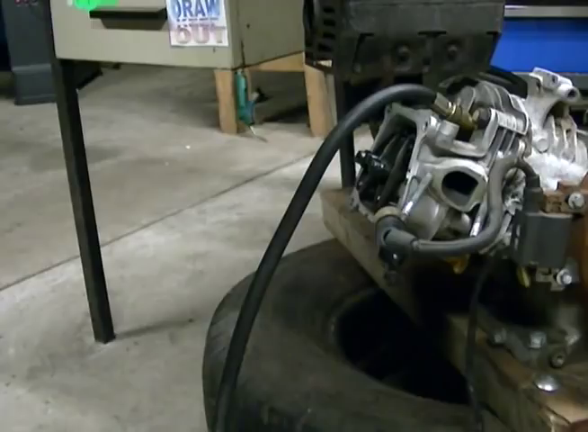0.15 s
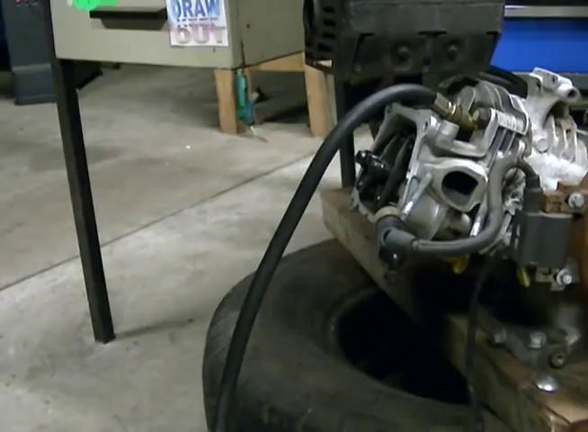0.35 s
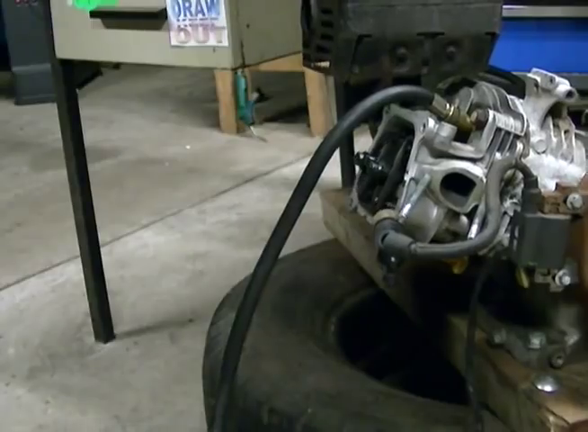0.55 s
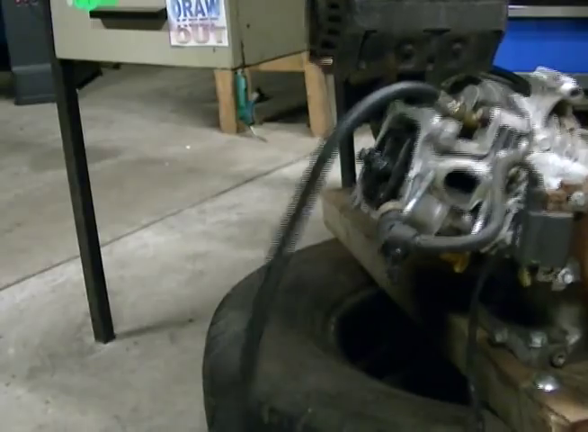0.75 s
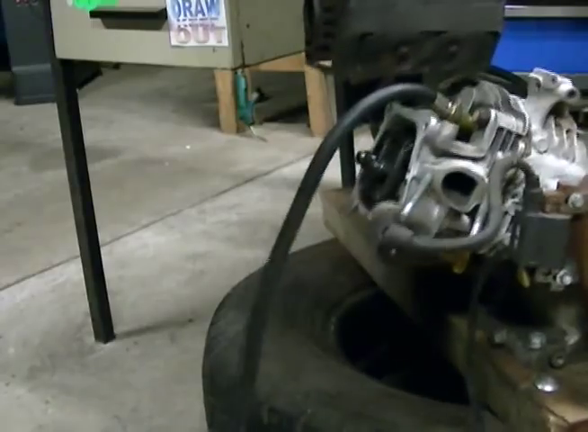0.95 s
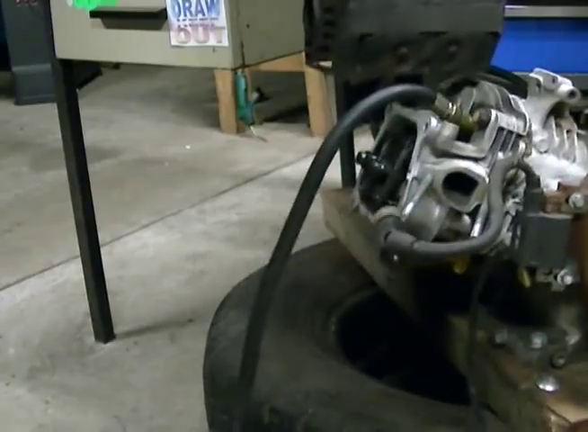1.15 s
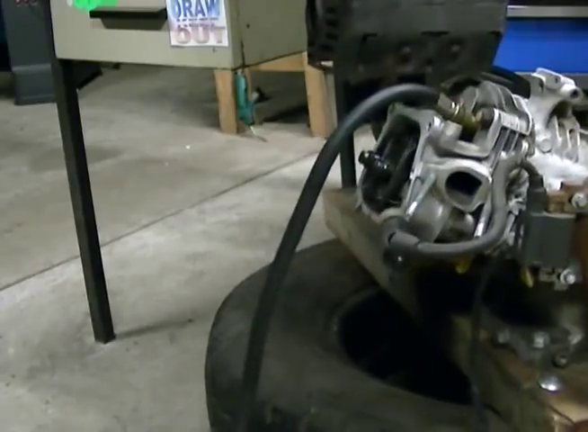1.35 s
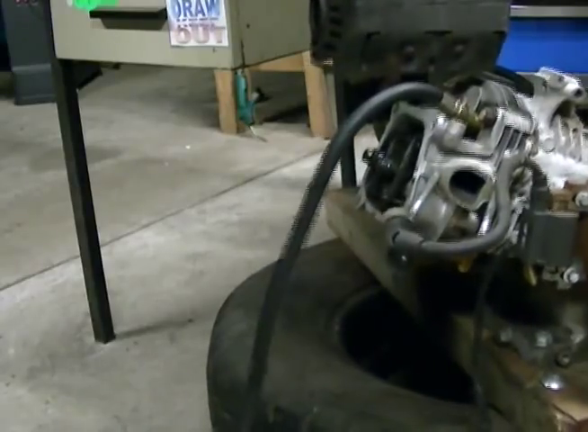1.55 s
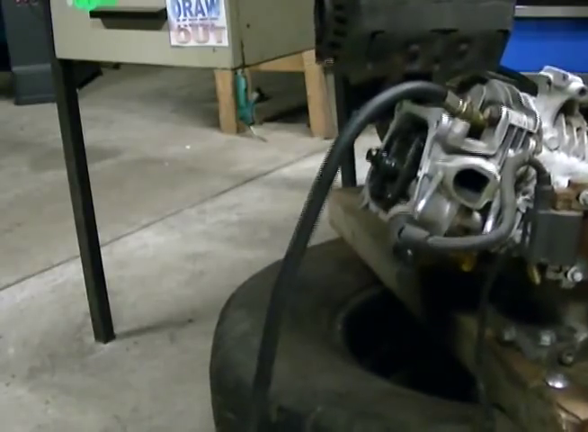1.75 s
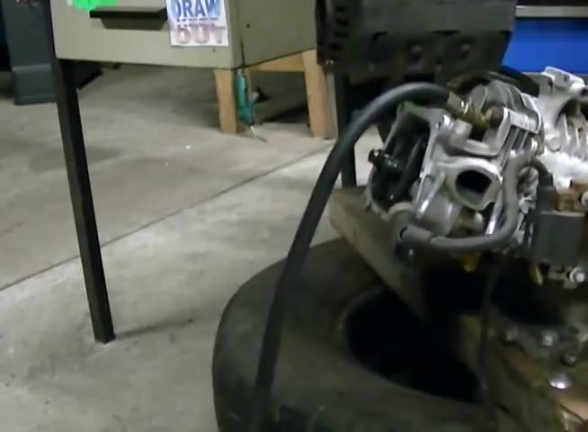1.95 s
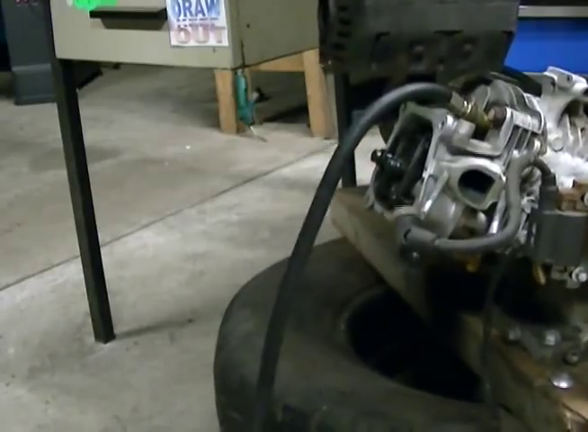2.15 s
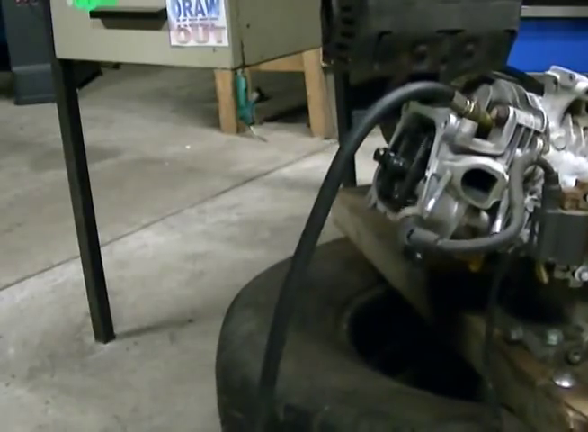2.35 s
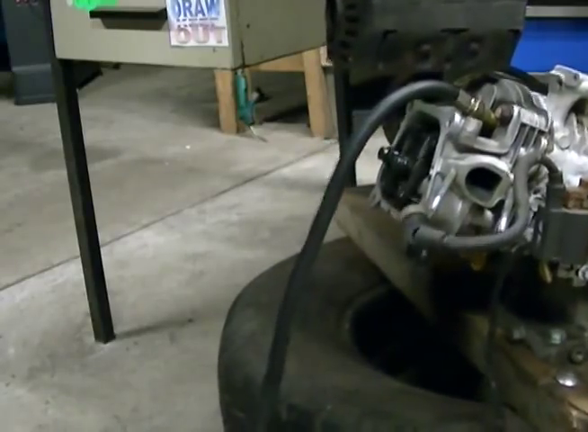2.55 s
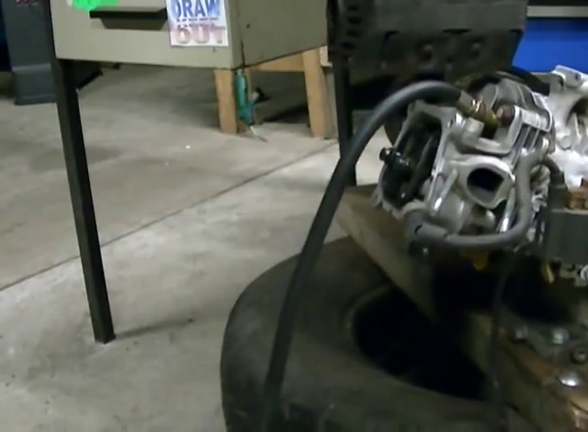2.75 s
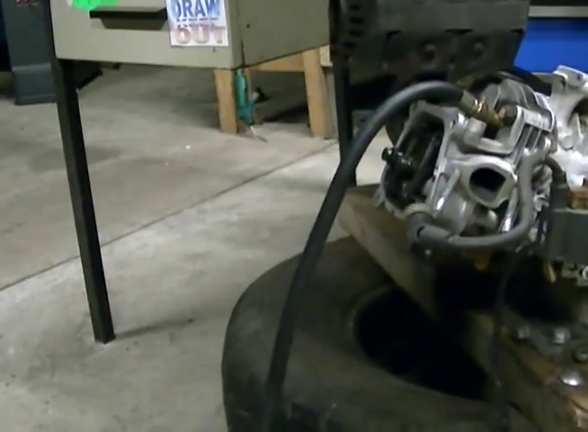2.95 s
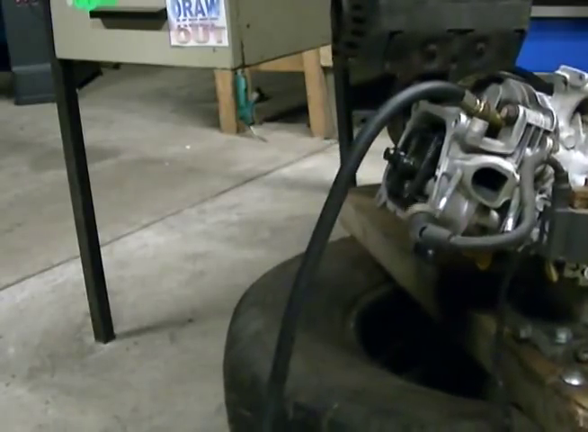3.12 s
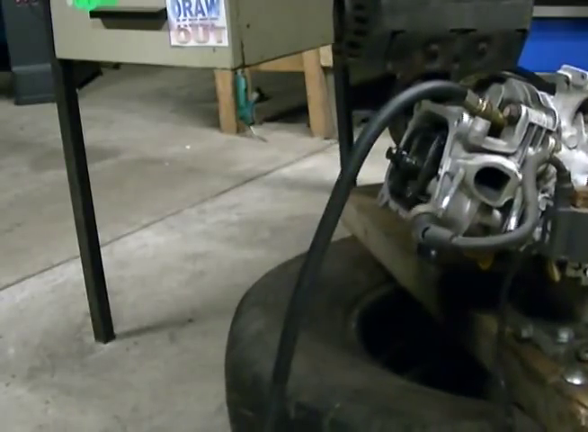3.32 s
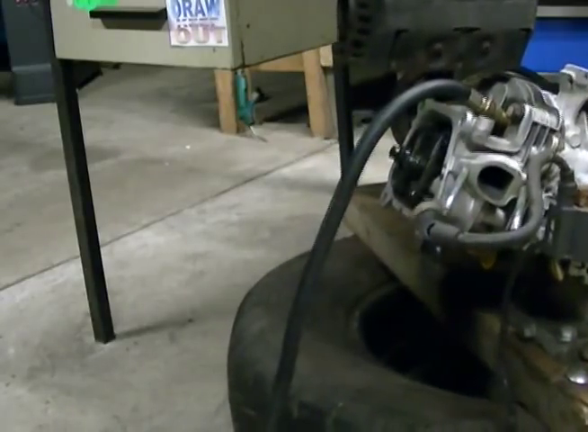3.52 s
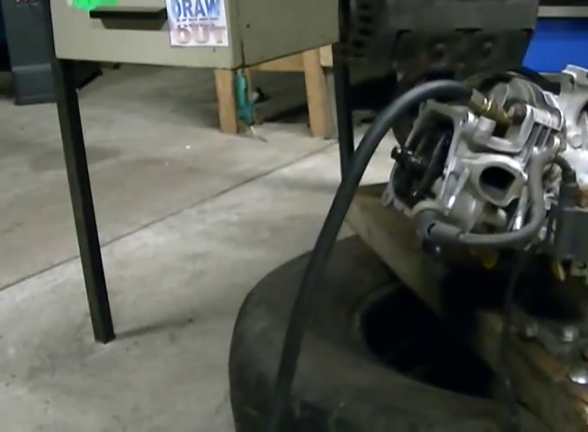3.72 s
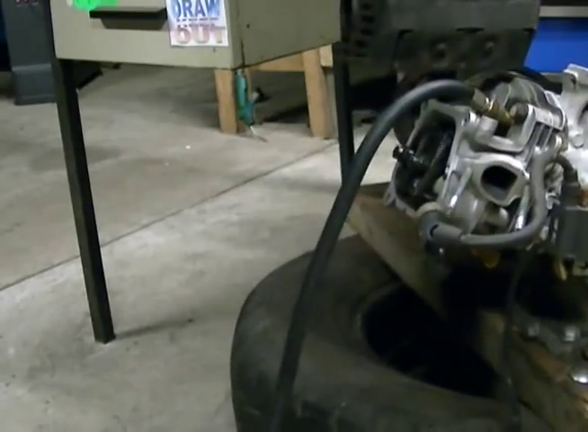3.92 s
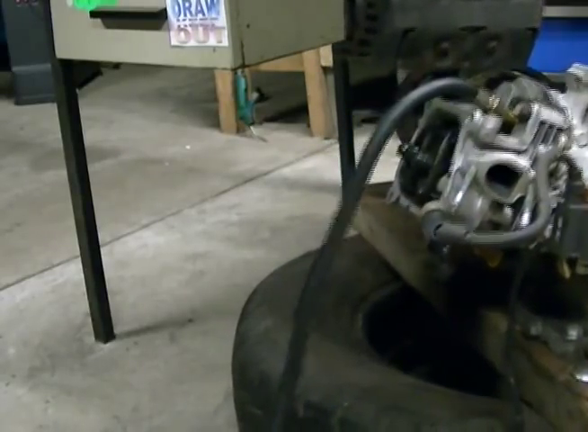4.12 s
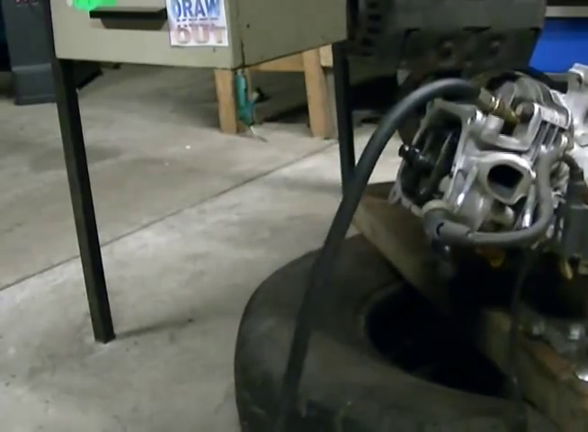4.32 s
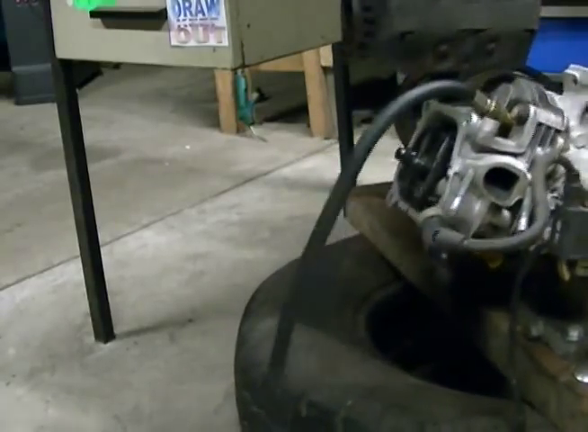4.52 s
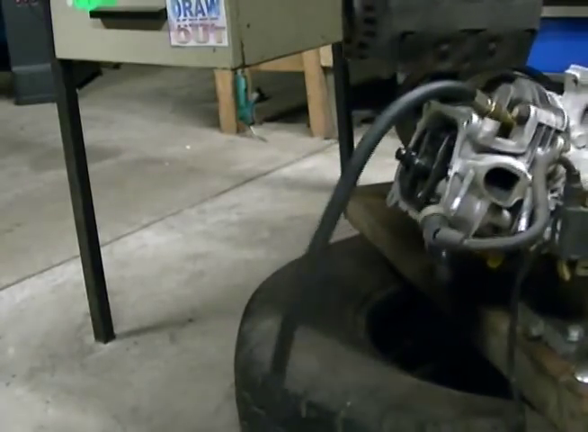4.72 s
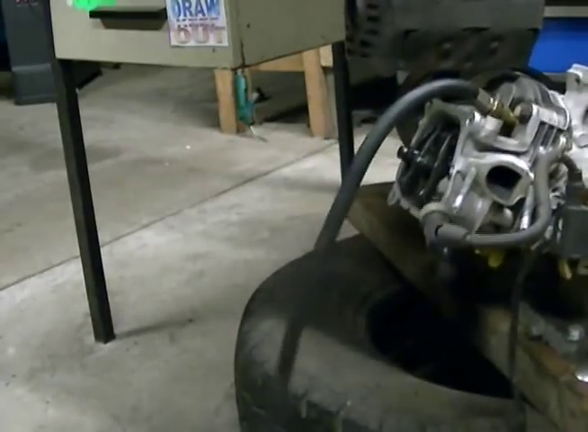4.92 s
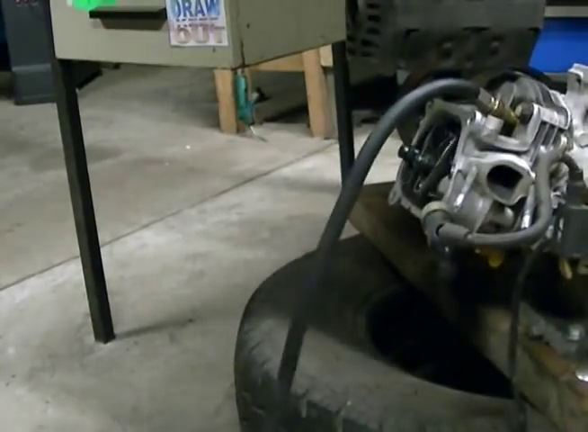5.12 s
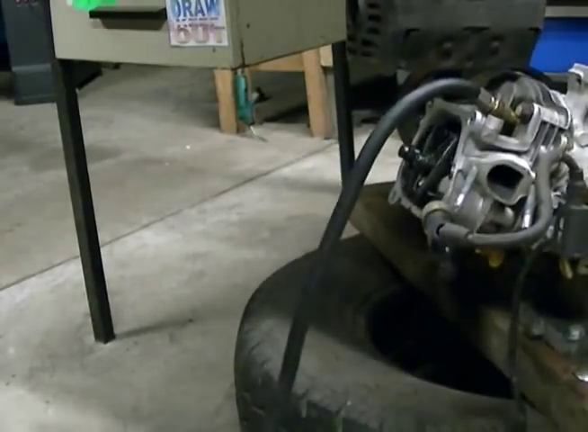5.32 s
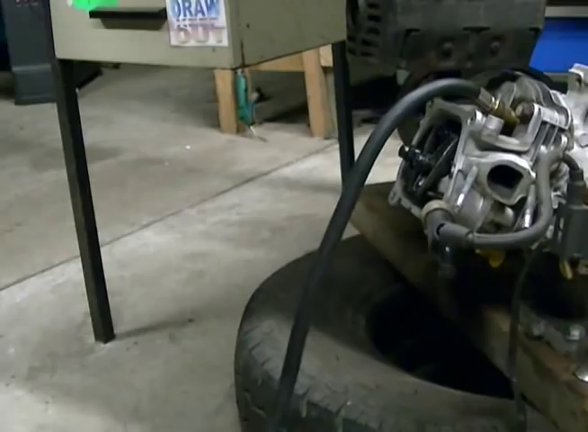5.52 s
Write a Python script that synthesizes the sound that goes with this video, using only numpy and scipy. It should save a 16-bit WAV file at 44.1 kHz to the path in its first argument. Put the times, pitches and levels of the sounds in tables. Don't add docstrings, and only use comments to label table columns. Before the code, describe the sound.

Starter knock, then fast even chugging of pops, metallic clatter, air hiss and small squeaks; it slows, stalls with clanks, and falls quiet.

```python
import sys
import numpy as np
from scipy import signal
from scipy.fft import rfft, irfft, next_fast_len
from scipy.io import wavfile

SR = 44100
rng = np.random.default_rng(int(sys.argv[2]) if len(sys.argv) > 2 else 0)


def log_audio(samples):
    frames = np.atleast_2d(samples).T
    limited = np.clip(frames, -1, 1)
    pcm = np.round(limited * 32767).astype(np.int16)
    wavfile.write(sys.argv[1], SR, pcm)


def field_ratio(decibels):
    return 10 ** (np.asarray(decibels, dtype=float) / 20)


N = 249849


def rms_one(x):
    return x / np.sqrt(np.mean(x ** 2) + 1e-20)


def peak_one(x):
    return x / np.abs(x).max()


def in_time(rows, silent_db=-120):
    s, *columns = np.transpose(rows)
    t = np.arange(N) / SR
    return [np.interp(t, s, c, left=silent_db, right=silent_db) for c in columns]


def high_pass(x, hz):
    return signal.sosfilt(signal.butter(4, hz, "high", fs=SR, output="sos"), x)


def band_pass(x, low, high):
    return signal.sosfilt(signal.butter(2, [low, high], "band", fs=SR, output="sos"), x)


def colour(x, points):
    size = next_fast_len(len(x) + 4096)
    size += size % 2
    hz, level_db = np.transpose(points)
    grid = np.arange(size // 2 + 1) * SR / size + 1
    log_gain = np.interp(np.log(grid), np.log(hz), level_db) * np.log(10) / 20
    cepstrum = irfft(log_gain, size)
    cepstrum[1:size // 2] *= 2
    cepstrum[size // 2 + 1:] = 0
    return irfft(rfft(x, size) * np.exp(rfft(cepstrum)), size)[:len(x)]


def ring(clicks, hz, t60):
    r, w = field_ratio(-60 / (abs(t60) * SR)), 2 * np.pi * hz / SR
    return signal.lfilter([0, np.sin(w)], [1, -2 * r * np.cos(w), r * r], clicks + 1e-18)


def resonate(x, hz, width):
    r, w = np.exp(-np.pi * abs(width) / SR), 2 * np.pi * hz / SR
    return signal.lfilter(np.array([1, 0, -1]) * (1 - r * r) / 2, [1, -2 * r * np.cos(w), r * r], x)


def wander(rate):
    r = np.exp(-2 * np.pi * rate / SR)
    return rms_one(signal.lfilter([1], [1, -2 * r, r * r], rng.standard_normal(N)))


def grains(per_s, spread_db, noise_share):
    sizes = field_ratio(spread_db * np.minimum(rng.exponential(1, N), 4.0)) * rng.choice([-1, 1], N)
    hits = rms_one(sizes * (rng.random(N) < per_s / SR))
    return rms_one(hits + noise_share * rng.standard_normal(N))


def impulses(seconds, gains):
    out = np.zeros(N)
    out[np.clip((np.asarray(seconds) * SR).astype(int), 0, N - 1)] = gains
    return out


# f/Hz, level/dB per Hz
HUM = [(18, -57.5), (30, -33), (114, -20.5), (130, -4.5), (148, 3.5), (178, -3.5), (237, 0), (270, -6.5),
       (973, -3), (1370, -9.5), (15600, -22.5)]


def hum():
    return field_ratio(-60) * rms_one(colour(rng.standard_normal(N), HUM))


# t/s, peak level/dB, main f/Hz, brightness/dB, metal ring/dB
KNOCKS = [(0.101, -45.5, 287, 7, -2), (0.436, -16, 900, -5, -14), (0.446, -32, 164, -20, -20),
          (0.786, -30, 200, -20, -18), (0.518, -7, 820, 7, -25), (4.388, -28, 236, 3, -17),
          (4.488, -3.5, 2450, 4, -2.5), (4.554, -16, 1340, -1, -9), (4.569, -18, 1360, -12, 5),
          (4.599, -18, 2970, 2, 3), (4.783, -33, 1920, -14, -15), (4.818, -35, 925, -15, -13),
          (4.883, -18, 824, -16, 3), (4.96, -6, 1700, 9, 7.5), (5.137, -37, 1335, -5, -10),
          (5.151, -26, 2240, -1, -5), (5.209, -43.5, 2370, 4, -7), (5.309, -35, 1355, 5, -3),
          (5.321, -36, 1330, 8, -9), (5.336, -43, 203, 2, -17), (5.584, -39, 1740, 15, -4.5),
          (5.637, -30, 520, 9, 1)]


def knocks():
    out, size, t60 = np.zeros(N), int(.25 * SR), 0.059
    t = np.arange(size) / SR
    for s, peak_db, hz, bright_db, metal_db in KNOCKS:
        crack = rng.standard_normal(size) * (1 - np.exp(-t / 0.00063)) * field_ratio(-60 * t / t60)
        modes = sum(field_ratio(db + rng.normal(0, 3.)) * ring(crack, f, 0.4 * d) for f, db, d in CASING)
        bright = colour(crack, RATTLE) + 0.3 * colour(crack, HISS)
        main = peak_one(ring(crack, hz, t60 / 3))
        knock = main + field_ratio(metal_db) * peak_one(modes) + field_ratio(bright_db - 7.5) * peak_one(bright)
        knock = high_pass(knock, min(.6 * hz, 480))
        i = int(s * SR)
        out[i:i + size] += (field_ratio(peak_db - 2) * peak_one(knock))[:N - i]
    return out


# f/Hz, t60/s
ROOM = [(150, 0.29), (1000, 0.56), (4000, 0.25), (12000, 0.29)]


def workshop(x):
    t = np.arange(int(.7 * SR)) / SR
    edges = 60 * 2. ** np.arange(9)
    hz, t60 = np.transpose(ROOM)
    tail = 0
    for low, high in zip(edges, edges[1:]):
        band = band_pass(rng.standard_normal(len(t)), low, high)
        tail = tail + band * field_ratio(-60 * t / np.interp(np.log(low * 0.85), np.log(hz), t60))
    tail = tail * (1 - np.exp(-t / 0.0088))
    return signal.fftconvolve(x, field_ratio(-12) * tail / np.sqrt(np.sum(tail ** 2)))[:N]


# t/s, crank position/cycles
LURCHES = [(.437, -.2), (.58, .17), (.612, .36), (.63, .45), (.705, .53), (.73, .59), (.765, .69),
           (.83, .87), (.95, 1.47), (4.085, 20.475), (4.125, 20.69), (4.225, 21.16), (4.305, 21.475),
           (4.37, 21.7), (4.45, 21.93), (4.53, 22.15), (4.59, 22.33), (4.7, 22.36)]


def crank():
    marks = [(row[0], k) for k, row in enumerate(POPS)] + LURCHES
    return np.transpose(sorted(marks))


# t/s, level/dB
EFFORT = [(.44, -17), (.47, -39), (.51, -26.5), (.53, -26), (.6, -20.5), (.66, -25.5), (.76, -29),
          (.82, -20.5), (.86, -19.5), (1.25, -18), (1.6, -16.5), (4.03, -16), (4.2, -20), (4.4, -28),
          (4.5, -27.5), (4.62, -37.5), (4.85, -48.5), (5.44, -68)]
FULL_EFFORT_DB = -16.5
# t/s, level/dB
JOLTS = [
    (4.887, -46),
    (4.966, -49),
]


def effort():
    t, fall_db_per_s = np.arange(N) / SR, 123
    shaking = sum((t > s) * field_ratio(level_db - fall_db_per_s * np.abs(t - s)) for s, level_db in JOLTS)
    return 20 * np.log10(field_ratio(in_time(EFFORT)[0]) + shaking)


def swells(angle, rows, bed_db, rise, coasting):
    total = field_ratio(bed_db)
    for share, width, level_db, loss_db in rows:
        away = ((angle[::16] - share + .5) % 1 - .5) / width
        bell = np.exp(-.5 * (away * np.where(away < 0, 1 / rise, rise)) ** 2)
        total = total + field_ratio(level_db - loss_db * coasting[::16]) * bell
    return np.interp(np.arange(N) / 16, np.arange(len(total)), 20 * np.log10(total))


# f/Hz, level/dB per Hz
RATTLE = [(18, -55), (30, -45), (109, -45), (163, -18), (359, -18), (526, -5.5), (789, 1), (1650, 1),
          (1860, -5.5), (2360, 2), (2660, -2.5), (4190, -0.5), (4960, -8.5), (5860, -8), (9000, -12.5),
          (11700, -51.5), (19800, -120)]


def gear_rattle(gain):
    clatter = field_ratio(1.24 * wander(100)) * grains(per_s=3000, spread_db=4.0, noise_share=0.75)
    return gain * rms_one(colour(clatter, RATTLE))


# f/Hz, level/dB, t60/s
CASING = [(544, -20.5, 0.13), (754, -5.5, 0.14), (1010, -9.5, 0.13), (1287, -14, 0.75), (1700, -8, 0.12),
          (2357, 0.5, 0.044), (2390, -3.5, .15), (2860, -2.5, 0.12), (3104, -4, 0.15), (3505, -14, 0.12),
          (4330, -17.5, 0.13), (4373, -10, 0.097), (5600, -17.5, 0.25), (6380, -11, 0.057)]


def casing_ringing(gain, slack_db):
    out = np.zeros(N)
    ringing_db = -1.5 - 0.3 * np.maximum(slack_db, -25)
    shakes = grains(per_s=900, spread_db=3.5, noise_share=0.11)
    for k, (hz, level_db, t60) in enumerate(CASING):
        own = np.roll(shakes, 7001 * k) * field_ratio(5.0 * np.minimum(wander(10.0), 1.6))
        damped_t60 = t60 * .2
        scale = np.std(ring(own[:N // 2], hz, damped_t60))
        out += ring(own * gain * field_ratio(ringing_db + 0.63 * level_db - 12), hz, damped_t60) / scale
    return out


def rumble(angle, effort_db):
    low = signal.sosfilt(signal.butter(2, 70, fs=SR, output="sos"), rng.standard_normal(N))
    return field_ratio(effort_db - 41.5 + 1.8 * np.cos(2 * np.pi * (angle - .8))) * rms_one(low)


# f/Hz, level/dB per Hz
HISS = [(1760, -13), (3000, -12.5), (3350, -13.5), (4230, 1), (5000, -9.5), (5810, 0.5), (6860, -3.5),
        (11800, -9.5), (14300, -19), (15600, -28.5)]
# place/share of cycle, half width/share of cycle, level/dB, loss when coasting/dB
AIR_SWELLS = [(.16, 0.018, 5.5, 3.5), (0.463, .035, 9, 7.5), (.685, 0.038, 2, -3.5), (.975, 0.024, 7.5, 31)]


def valve_air(angle, coasting, depth):
    unengaged = np.arange(N) / SR < .517
    hiss_db = -22 + 1.28 * (in_time(EFFORT)[0] - FULL_EFFORT_DB) - 29 * unengaged
    patchy_db = 1.5
    air = rms_one(colour(grains(per_s=9000, spread_db=4.5, noise_share=0.9), HISS))
    air = air * field_ratio(patchy_db * wander(51))
    top = high_pass(air, 6700) * field_ratio(patchy_db * wander(25))
    swell = depth * swells(angle, AIR_SWELLS, bed_db=-16, rise=.8, coasting=coasting)
    return field_ratio(hiss_db + swell) * (air + top * (field_ratio(.45 * swell - 1.5) - 1))


# place/share of cycle, half width/share of cycle, level/dB, loss when coasting/dB
RATTLE_SWELLS = [(.1, .05, -2.5, -5), (.2, 0.028, -4.3, -7), (0.428, 0.037, 0, 0), (0.531, 0.01, -2, 2),
                 (0.658, .04, 0.5, 0.5), (.735, 0.031, -0.5, 13.5), (0.932, 0.032, -3, -5),
                 (0.997, 0.019, 4, 20)]


def turning(angle):
    t, effort_db = np.arange(N) / SR, effort()
    slack_db = effort_db - FULL_EFFORT_DB
    coasting = np.clip((t - 4.2) / 0.087, 0, 1)
    depth = np.clip(1 - (t - 4.595) / 0.0185, 0, 1)
    swell = swells(angle, RATTLE_SWELLS, bed_db=-8.5, rise=1, coasting=coasting)
    gain = field_ratio(effort_db + depth * swell)
    rattle = gear_rattle(gain) + casing_ringing(gain, slack_db)
    jets = valve_air(angle, coasting, depth)
    swing_db = 5 * np.cos(2 * np.pi * (angle - 0.82)) + .5 * slack_db
    body = band_pass(rattle, 225, 450) * field_ratio(1 + depth * swing_db)
    return high_pass(rattle + jets, 440) + body + rumble(angle, effort_db)


# t/s, pop level/dB, valve squeak level/dB
POPS = [(0.5246, -14.9, -40), (0.8575, -11.6, -40), (1.0769, -14.4, -16), (1.2682, -11.4, -11.5),
        (1.4492, -8.2, -12.5), (1.6222, -7.6, -17.5), (1.7894, -9.9, -16), (1.9558, -8.1, -11),
        (2.1187, -8.8, -10.5), (2.2789, -8.6, -14), (2.4401, -6.5, -15), (2.5993, -6.9, -11),
        (2.7577, -6.5, -13.5), (2.9141, -8.2, -9), (3.072, -6.5, -11), (3.2281, -6.2, -13),
        (3.3839, -7.9, -9.5), (3.5396, -5.7, -5.5), (3.6951, -6.3, -8), (3.8506, -6.4, -13),
        (4.0061, -7.0, -14), (4.1952, -11.8, -22), (4.4925, -19.7, -40), (4.9641, -15.8, -40)]
# place/share of cycle, f/Hz, level under the pop/dB, t60/s, softness/ms
CONTACTS = [(.058, 760, -9, .015, .4), (.2, 960, -11, .02, .3), (.385, 900, -14, .02, .3),
            (.51, 1050, -7, .012, .3), (.745, 820, -9, .015, .3), (.97, 540, -19, .12, .6),
            (.6, 540, -26, .25, .6), (.535, 176, -22, .13, 3.5), (.795, 172, -21, .08, 3.5),
            (.7, 200, -27, .07, 3.0), (.99, 210, -25, .05, 2.5)]


def port(seconds, cycles):
    at, level_db, _ = np.transpose(POPS)
    pop_hz, pop_t60_s = 770, .0075
    pop_db = level_db + 2.3
    t, swell = np.arange(600) / SR, pop_t60_s / np.log(1000)
    pop = -t / swell * np.exp(1 - t / swell) * np.sin(2 * np.pi * pop_hz * t)
    out = signal.fftconvolve(impulses(at - 1.25 / pop_hz, field_ratio(pop_db)), high_pass(pop, 200))[:N]
    chance_db = rng.normal(0, 1.0, (len(at), len(CONTACTS)))
    for k, (share, hz, under_db, t60, soft_ms) in enumerate(CONTACTS):
        when = np.interp(np.arange(1, 21) + share, cycles, seconds)
        soft = np.hanning(int(soft_ms * SR / 1000) + 3)
        clicks = impulses(when, field_ratio(pop_db + under_db + chance_db[:, k])[1:21])
        clicks = np.convolve(clicks, soft / soft.sum())[:N]
        out += high_pass(ring(clicks, hz, t60), .62 * hz)
    return out


def squeaks(seconds, cycles):
    out, t = np.zeros(N), np.arange(-600, 900) / SR
    half_s, fall_per_s = 0.0058, 5.2
    for k, (_, _, power_db) in enumerate(POPS):
        s = np.interp(k + .108, cycles, seconds)
        hz = 2035 * (1 + 0.016 * rng.standard_normal())
        shape = np.exp(-.5 * (t / np.where(t < 0, 1.7 * half_s, 0.81 * half_s)) ** 2)
        phase = 2 * np.pi * (hz * (t - .5 * fall_per_s * t * t) + rng.random())
        flutter = 1 + 0.72 * rms_one(resonate(rng.standard_normal(len(t)), 300, 300))
        i = int(s * SR) - 600
        out[i:i + len(t)] += field_ratio(power_db - 3.5) * shape * flutter * np.sin(phase)
    return out


# t/s, peak level/dB, t60/s
TICKS = [
    (4.601, -14.5, 0.044),
    (4.797, -36, 0.017),
    (4.957, -21, 0.035),
    (5.154, -28, 0.015),
]


def ticks():
    t = np.arange(N) / SR
    gain = sum((t > s) * field_ratio(peak_db - 60 * np.abs(t - s) / t60) for s, peak_db, t60 in TICKS)
    duller = HISS + np.array([0, -1]) * np.arange(len(HISS))[:, None]
    puff = high_pass(colour(rng.standard_normal(N), duller), 3500)
    return gain * rms_one(puff) / 2


# f/Hz, level/dB per Hz
SOLE = [(120, -36), (200, -21.5), (560, -7.5), (761, -8), (1090, -9.5), (1310, -7), (1690, -5.5),
        (4010, -14), (5070, -10), (10600, -20), (15000, -34.5)]
# loudest at t/s, build-up/s, fade/s, level/dB
DRAGS = [
    (5.486, .05, .066, -54),
    (5.638, .056, .018, -44),
]


def shuffle():
    gain, swell_db = 0, 8
    for s, rise, fade, db in DRAGS:
        curve = [(s - rise, db - swell_db), (s, db), (s + 2 * fade, db - 2 * swell_db)]
        gain = gain + field_ratio(in_time(curve)[0])
    return gain * rms_one(colour(grains(per_s=1400, spread_db=4.0, noise_share=.7), SOLE))


def scene():
    seconds, cycles = crank()
    angle = np.interp(np.arange(N) / SR, seconds, cycles)
    near = knocks() + turning(angle) + port(seconds, cycles) + squeaks(seconds, cycles) + ticks()
    return (hum() + near + workshop(near) + shuffle())[None]


def top_cut(x):
    return signal.sosfilt(signal.butter(12, 15730, fs=SR, output="sos"), x)


def record(dry):
    x = high_pass(1.4 * np.tanh(dry / 1.4), 20)
    x = np.clip(x, -.96, .96)
    x = signal.sosfilt(signal.cheby2(10, 50, 16500, fs=SR, output="sos"), x)
    mix = x * (np.arange(N) < 5.665 * SR)
    return top_cut(mix)


dry = scene()
out = record(dry)
log_audio(out)
```